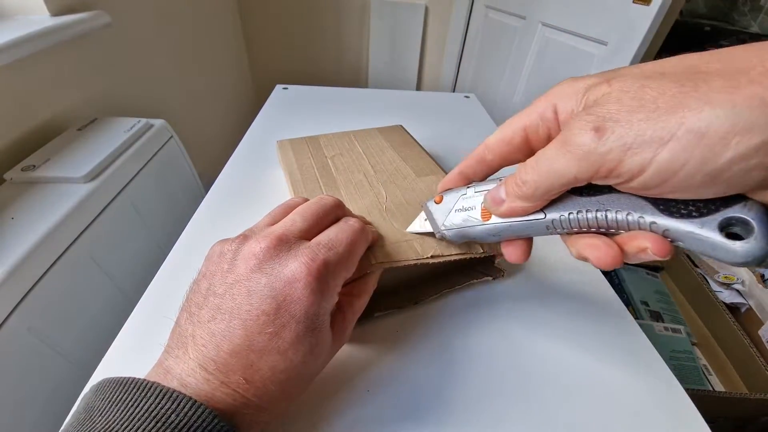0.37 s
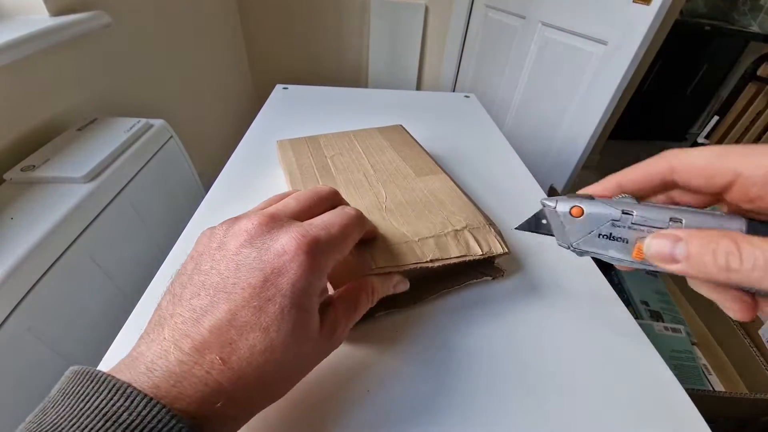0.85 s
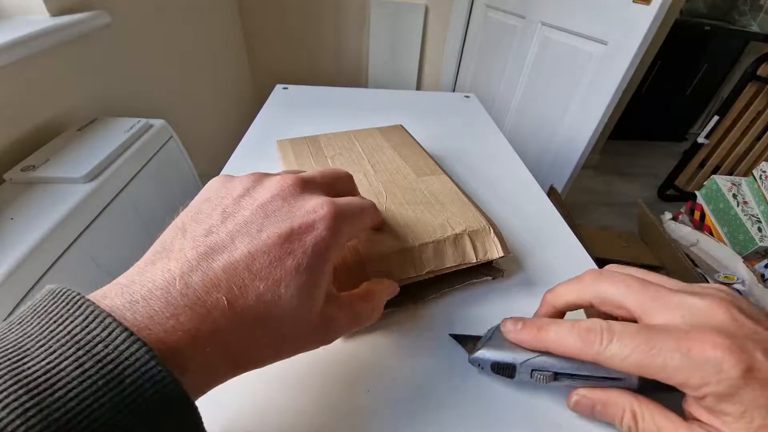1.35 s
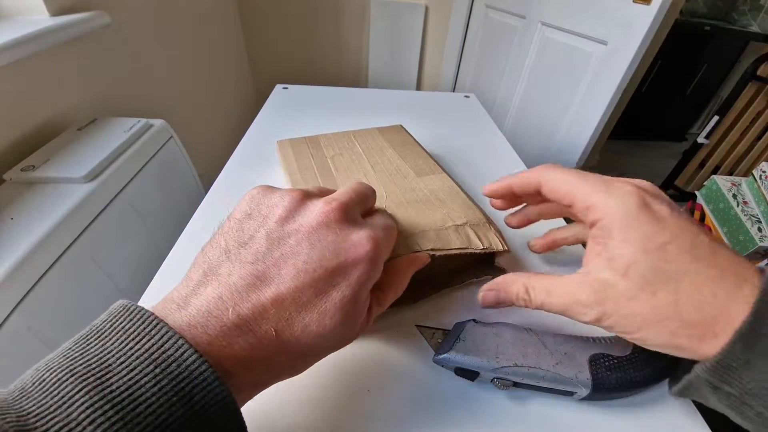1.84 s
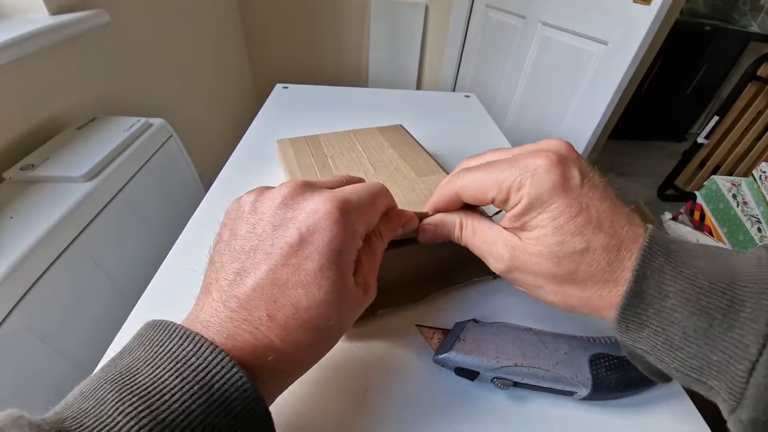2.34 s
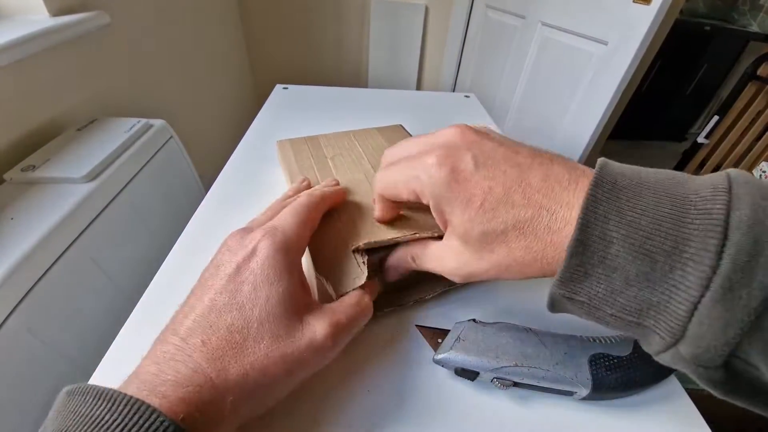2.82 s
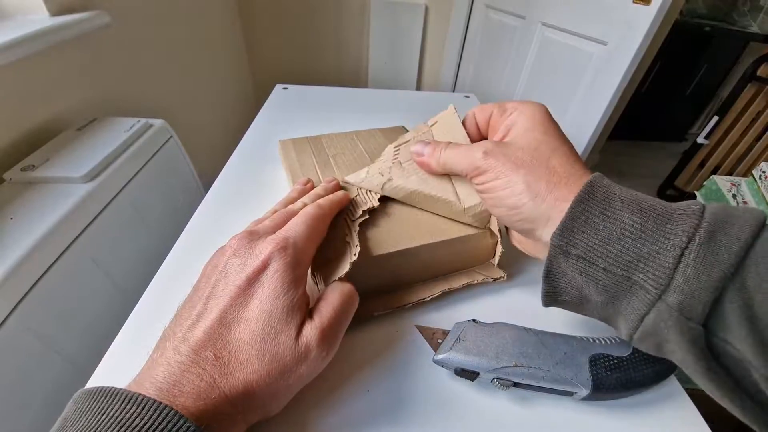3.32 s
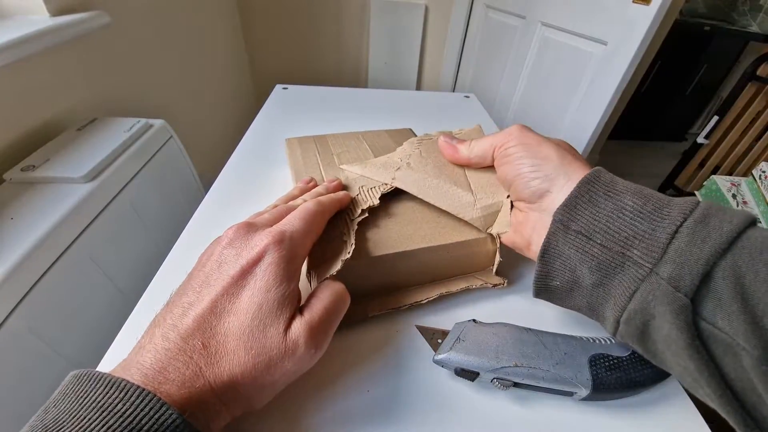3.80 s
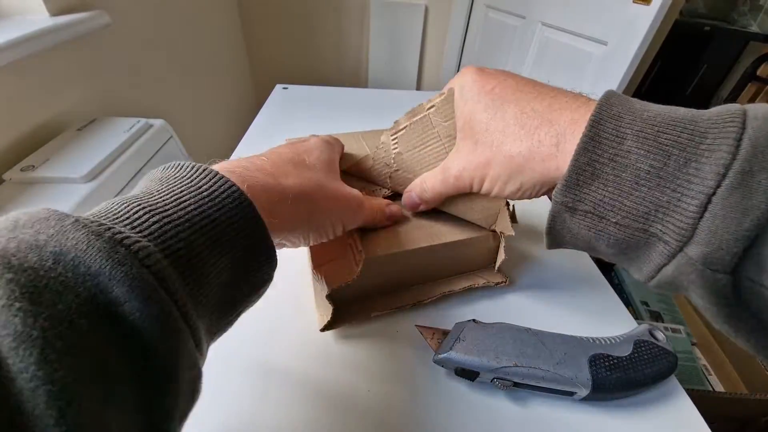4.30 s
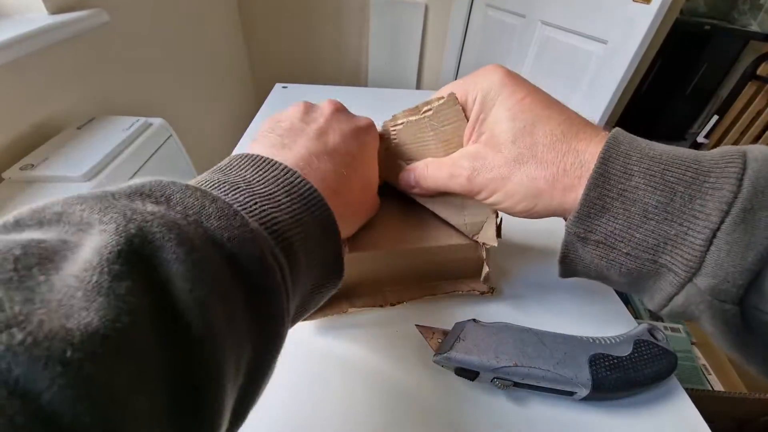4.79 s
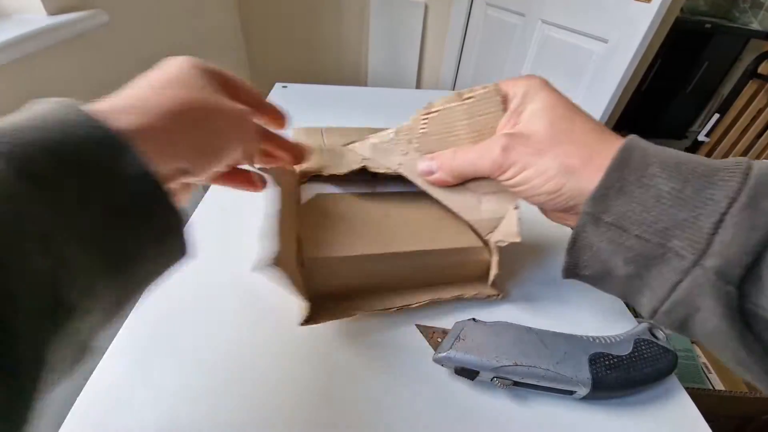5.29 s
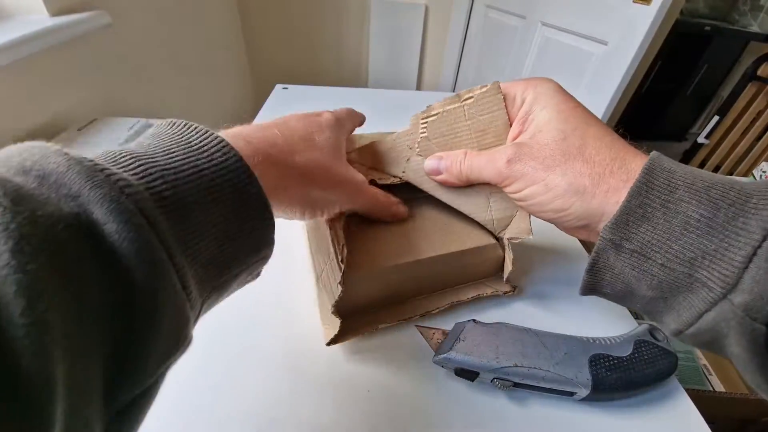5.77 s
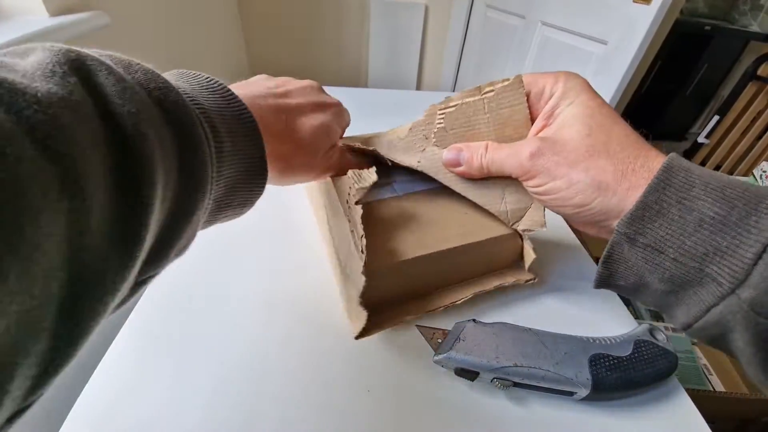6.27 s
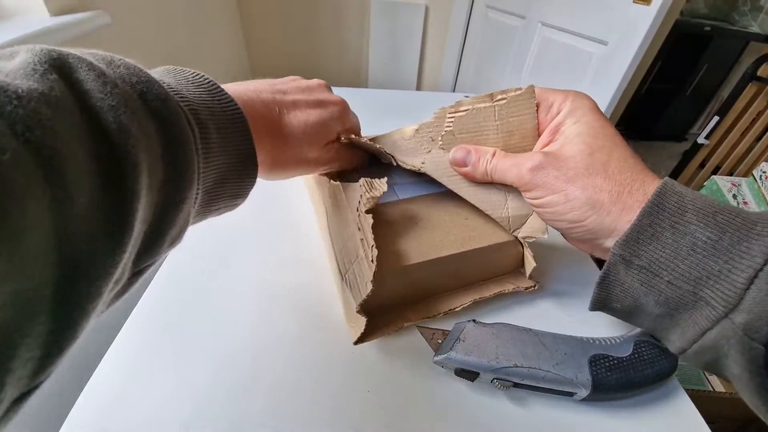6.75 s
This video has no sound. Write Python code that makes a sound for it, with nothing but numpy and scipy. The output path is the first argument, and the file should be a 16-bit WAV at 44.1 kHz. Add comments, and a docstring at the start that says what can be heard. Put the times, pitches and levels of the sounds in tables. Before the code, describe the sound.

Close, dry stereo in a small quiet room. A knife rasps through corrugated cardboard for under a second, light rustles follow, and its handle lands on a hollow table with a double knock. Then fingers pull the board apart: sharp glue snaps, crackling fibre tears and creaks, growing heavier, with low thumps and rumble as the parcel shifts.

```python
"""Cardboard fibres tear in a dense bright crackle: clumpy hiss with random pops that ring briefly.
First a knife is drawn through the parcel, then it is laid down and hands rip the board open.
The board creaks as shaken resonances, glue snaps as short pulses with fizz, an edge ratchets, a fingertip squeaks.
The hollow table knocks through its ringing modes and rumbles under the parcel.
A small room of feedback delays answers, over a faint hush, at a close pair of microphones."""
import sys
import numpy as np
from scipy import signal
from scipy.fft import rfft, irfft, next_fast_len
from scipy.io import wavfile
from scipy.ndimage import map_coordinates

SR = 44100
rng = np.random.default_rng(int(sys.argv[2]) if len(sys.argv) > 2 else 0)


def log_audio(samples):
    """Write samples as a 16-bit WAV file to the path given in sys.argv[1]."""
    # one column per channel
    frames = np.atleast_2d(samples).T
    # limit to full scale, then quantise
    limited = np.clip(frames, -1, 1)
    pcm = np.round(limited * 32767).astype(np.int16)
    wavfile.write(sys.argv[1], SR, pcm)


def gain_from_db(level_db):
    """Turn a decibel level (scalar or array-like) into a linear amplitude factor."""
    decades = np.asarray(level_db, float) / 20
    return 10 ** decades


N = 303554

CUT_ENDS_S = 0.684   # the knife works until here, then the hands


def rms_one(x):
    """Scale to rms 1."""
    return x / np.sqrt(np.mean(x ** 2) + 1e-20)


def between(start, end):
    """True inside a stretch of time in seconds."""
    return (np.arange(N) >= start * SR) & (np.arange(N) < end * SR)


def in_time(rows):
    """Draw straight lines between the rows of a table: one curve per column, sample by sample."""
    s, *columns = np.transpose(rows)
    return [np.interp(np.arange(N) / SR, s, column) for column in columns]


def swells(s, db, rise_s, fall_s):
    """Each swell climbs to its peak and falls away evenly in dB; their powers add. Returns dB."""
    t = np.arange(0, N + 32, 32) / SR
    since = t - np.c_[s]
    rise = np.c_[np.maximum(rise_s, 0.002)]   # seconds per 20 dB, never under 2 ms
    fall = np.c_[np.maximum(fall_s, 0.002)]
    down = np.where(since < 0, -since / rise, since / fall)
    power = np.sum(gain_from_db(np.c_[db] - 20 * np.minimum(down, 8)) ** 2, axis=0)
    return np.interp(np.arange(N) / SR, t, 10 * np.log10(power))


def colour(x, spectrum):
    """Give a flat signal a spectrum in dB per Hz; rms 1."""
    size = next_fast_len(N)
    hz, db = np.transpose(spectrum)
    bins_hz = np.fft.rfftfreq(size, 1 / SR)
    gain = gain_from_db(np.interp(np.log(bins_hz + 1), np.log(hz), db))
    return rms_one(irfft(rfft(x, size) * gain, size)[..., :N])


def split(x, hz=8200.0):
    """Below and above a frequency, each rms 1."""
    filters = [signal.butter(3, hz, kind, fs=SR, output="sos") for kind in ("low", "high")]
    return [rms_one(signal.sosfilt(sos, x)) for sos in filters]


def band_pass(x, order, low_hz, high_hz):
    """Keep the sound between two frequencies."""
    return signal.sosfilt(signal.butter(order, [low_hz, high_hz], "band", fs=SR, output="sos"), x)


def decay(x, t60_s):
    """Let every click die away evenly, by 60 dB in t60_s."""
    return signal.lfilter([1], [1, -gain_from_db(-60 / (t60_s * SR))], x)


def soften(x, hz):
    """A soft contact blurs a blow: twice a one-pole low-pass."""
    r = np.exp(-2 * np.pi * hz / SR)
    return signal.lfilter([(1 - r) ** 2], [1, -2 * r, r * r], x)


def flutter(rate):
    """Slow chance: noise twice through a one-pole low-pass; spread 1."""
    r = np.exp(-2 * np.pi * rate / SR)
    noise = rng.standard_normal(N + SR)
    return rms_one(signal.lfilter([1], [1, -2 * r, r * r], noise)[SR:])


def grains(per_s, spread_db):
    """Random clicks with a long tail of sizes and either sign."""
    sizes = gain_from_db(spread_db * np.minimum(rng.exponential(1, N), 5)) * rng.choice([-1, 1], N)
    return sizes * (rng.random(N) < per_s / SR)


def clicks(seconds, db):
    """One impulse per event, over a floor far too faint to hear."""
    out = np.full(N, 1e-18)
    places = np.minimum(np.round(np.asarray(seconds) * SR).astype(int), N - 1)
    np.add.at(out, places, gain_from_db(db))
    return out


# colour of the background hush: [f/Hz, level/dB per Hz], only its shape counts
HUSH_COLOUR = [(18, -33), (30, 1.5), (273, -6), (540, -3.5), (822, 7.5), (3140, -3), (4190, -15),
               (4530, -27.5), (6380, -17.5), (16000, -37)]


def hush():
    """A faint steady background: coloured noise, separate on each side."""
    return gain_from_db(-69) * colour(rng.standard_normal((2, N)), HUSH_COLOUR)


ROOM_T60_S, WALL_CUT_HZ = 0.22, 11400


def room(x):
    """Eight feedback delays a side, duller on every round, stepped block by block."""
    out = np.zeros((2, N))
    dull = np.exp(-2 * np.pi * WALL_CUT_HZ / SR)
    lags = (rng.uniform(0.009, 0.035, 16) * SR).astype(int)
    for k, lag in enumerate(lags):
        loop, state = x.copy(), [0.]
        gain = gain_from_db(-60 * lag / SR / ROOM_T60_S)
        for i in range(lag, N, lag):
            back, state = signal.lfilter([gain * (1 - dull)], [1, -dull], loop[i - lag:i], zi=state)
            loop[i:i + lag] += back[:N - i]
        out[k % 2] += (loop - x) * (-1) ** (k // 2)
    return out


def mirrored(pair):
    """The table top mirrors the parcel; the detour shifts as hands and flaps move, so notches wander."""
    detour = SR * np.clip(0.0007 + 0.00015 * flutter(1.0), 0.0001, 0.003)   # samples
    path = [np.arange(N) - detour]
    echo = [map_coordinates(side, path, order=3, mode="nearest") for side in pair]
    return pair + 0.3 * np.array(echo)


# ringing modes of the table top: [f/Hz, level/dB, time to die by 60 dB t/s]
TABLE_MODES = [(194.4, -29, 0.17), (247, -39, 0.47), (298.4, -26.5, 0.29), (312, -7, 0.12),
               (345, -8.5, 0.14), (390, -19.5, 0.12), (437, -23.5, .1), (513, -19, 0.055), (545, -33, 0.18),
               (565, -20.5, 0.2), (678, -22.5, 0.12), (713, -19, 0.16), (810, -27.5, .1), (1022, -26, 0.22),
               (1123, -26, .1), (1280, -24, 0.051), (1377, -19.5, 0.088), (1535, -26, 0.089),
               (1590, -33, 0.12), (2015, -53, .1), (3100, -47, .06), (4011, -41, .06)]


def table(force):
    """A blow sets each mode of the table top ringing; the top radiates little below its modes."""
    out = 0
    for hz, db, t60 in TABLE_MODES:
        r, w = gain_from_db(-60 / (t60 * SR)), 2 * np.pi * hz / SR
        out = out - signal.lfilter([0, gain_from_db(db) * np.sin(w)], [1, -2 * r * np.cos(w), r * r], force)
    return signal.sosfilt(signal.butter(4, 200, "high", fs=SR, output="sos"), out)


# knocks passed into the table top: [t/s, level/dB compared with one another]
KNOCK_TIMES = [(0.238, -47), (0.345, -27), (0.479, -30), (0.691, -21.5), (0.754, -35), (0.839, -36),
               (1.134, -40), (1.28, -47), (1.37, -51), (1.447, -25), (1.595, -19.5), (2.145, -34.5),
               (2.491, -31.5), (2.622, -34.5), (2.983, -34.5), (3.089, -23.5), (3.287, -27.5), (4.027, -42),
               (4.339, -43), (4.461, -41), (4.587, -26), (4.69, -32), (4.931, -50.5), (4.996, -11.5),
               (5.2, -29), (5.28, -27.5), (5.332, -36), (5.382, -30), (5.492, -19), (5.579, -20.5),
               (5.651, -29), (5.845, -24.5), (6.01, -30), (6.137, -23), (6.283, -19), (6.385, -15.5),
               (6.41, -27), (6.45, -19.5), (6.572, -34), (6.615, -27), (6.744, -34.5), (6.803, -16.5)]


def knocks():
    """Soft bumps of the parcel set the table top ringing."""
    s, db = np.transpose(KNOCK_TIMES)
    return table(soften(clicks(s, db - 3.0), 433))


# the handle's landings: [t/s, blow level/dB, hardness as low-pass f/Hz, tick level/dB, free ring t/s];
# the levels compare the landings with one another
HANDLE_LANDINGS = [(1.464, 1, 1110, -25, 0.016), (1.617, -21, 1800, -32, 0.0083),
                   (1.691, -2.5, 970, -28, 0.028), (1.701, -7, 2240, -37, .011)]
# the hollow frame under the top: [f/Hz, level/dB per Hz], only its shape counts
FRAME_COLOUR = [(140, -32), (220, -6), (320, 3), (480, -11.5), (750, -12.5), (1400, -24), (2000, -28),
                (3000, -76)]


def knife_laid_down():
    """Hard landings of the knife handle ring the table, shudder its frame and tick."""
    out, t = 0, np.arange(N) / SR
    for s, db, hardness_hz, tick_db, free_s in HANDLE_LANDINGS:
        # the handle comes to rest and damps the top
        settled = np.clip((t - s - free_s) / 0.00201, 0, 1)
        out = out + gain_from_db(-11 * settled) * table(soften(clicks([s], db), hardness_hz))
    s, db, hardness_hz, tick_db, free_s = np.transpose(HANDLE_LANDINGS)
    dying = decay(soften(clicks(s, db - 24.5), 51), 0.28)
    dying += decay(clicks(s, db - 40.5), 0.6)   # a fainter, longer tail
    # the frame has too many modes to tell apart, so noise stands for them
    shudder = dying * colour(rng.standard_normal(N), FRAME_COLOUR)
    tick = decay(clicks(s, tick_db + 5), 0.02) * rng.standard_normal(N)   # plastic on laminate
    return out + shudder + band_pass(tick, 2, 1000, 7000)


# colour of the parcel dragging: [f/Hz, level/dB per Hz], only its shape counts
RUMBLE_COLOUR = [(15, -34), (25, -18.5), (91, -2.5), (242, -3.5), (335, 3), (394, -10.5), (447, -1),
                 (500, -13.5), (650, -42), (1100, -120)]


def rumble(db):
    """The parcel drags and rocks on the table in lumps of noise, which also excite the table top."""
    lumps = rng.standard_normal(N) * gain_from_db(4.1 * flutter(14))
    return gain_from_db(db) * rms_one(colour(lumps, RUMBLE_COLOUR) + 0.41 * rms_one(table(lumps)))


# cardboard panel in the hands: [f/Hz, width f/Hz, level/dB]
BOARD_PEAKS = [(268, 50, -18), (580, 162, -2), (750, 209, -0.5), (928, 124, -0.5), (1352, 384, -2.5),
               (1442, 303, 0), (2053, 370, -8.5), (3120, 280, -15.5)]


def board(force, peaks=BOARD_PEAKS):
    """Broad panel resonances in parallel, signs alternating."""
    out = 0
    for k, (hz, width_hz, db) in enumerate(peaks):
        r = np.exp(-np.pi * width_hz / SR)
        poles = [1, -2 * r * np.cos(2 * np.pi * hz / SR), r * r]
        ring = signal.lfilter([1, 0, -1], poles, force) * (1 - r * r) / 2
        out = out + (-1) ** k * gain_from_db(db) * ring
    return out


# a fingertip squeaks on the liner: [peak t/s, level/dB, rise t/s per 20 dB, fall t/s per 20 dB]
SQUEAK_SWELLS = [(2.5, -54, .04, .25), (2.594, -52, .1, .08)]


def squeak():
    """A fingertip rubs the liner: noise twice through one narrow resonance."""
    peak = [(1890, 260, 0)]   # f/Hz, width f/Hz, level/dB
    tone = board(board(rng.standard_normal(N), peak), peak)
    return gain_from_db(swells(*np.transpose(SQUEAK_SWELLS))) * rms_one(tone)


RATCHET_START_S, RATCHET_STEP_S, RATCHET_FLUTES = 6.1385, 0.0135, 7


def ratchet():
    """An edge ratchets over the flutes: one dull pop each, with a short ring of the panel."""
    chance = rng.standard_normal((RATCHET_FLUTES, 2))
    s = RATCHET_START_S + RATCHET_STEP_S * (np.arange(RATCHET_FLUTES) + 0.08 * chance[:, 0])
    uneven_db = 2 * chance[:, 1]
    pop = band_pass(clicks(s, uneven_db + 1), 3, 450, 1700)
    return pop + board(soften(clicks(s, uneven_db + 10), 960))


# glue and fibre bundles snapping: [t/s, crack level/dB, board ring level/dB before a common boost]
SNAP_TIMES = [(0.5891, -31, -37), (0.6847, -41, -24), (0.6925, -32, -22.5), (0.7004, -26, -30),
              (1.0104, -24.5, -62), (1.1098, -47, -65), (1.1857, -41, -49), (1.277, -52, -63),
              (2.0255, -46, -46.5), (2.0363, -42, -57), (2.0497, -52, -60), (2.144, -49, -54),
              (2.2486, -62, -42.5), (2.2885, -30, -41), (2.3307, -7, -29), (2.3434, -13, -35),
              (2.3505, -15, -27), (2.3654, -10, -38), (2.4858, -27, -34.5), (2.5331, -30, -57),
              (2.5691, -24, -53), (2.5828, -16.5, -42), (2.745, -31, -46.5), (2.7945, -48, -44),
              (2.9238, -48, -38), (2.9844, -38, -39.5), (3.0485, -27, -36), (3.0784, -39, -32),
              (3.0915, -13.5, -28), (3.1124, -25, -31), (3.2101, -28, -61), (3.247, -23, -44),
              (3.2808, -24, -37), (3.2954, -16, -43), (3.4009, -18, -47), (3.5578, -35, -44),
              (3.6, -27, -45.5), (3.6526, -31, -45), (3.7234, -45, -36), (3.7374, -28, -43.5),
              (3.8022, -31, -54), (3.8417, -42, -49), (3.8736, -39, -59), (3.908, -24.5, -49.5),
              (4.0241, -28.5, -29), (4.3635, -28.5, -40.5), (4.4, -24.5, -49.5), (4.5544, -35.5, -42),
              (4.6004, -41, -38.5), (4.7634, -26, -34), (4.824, -27, -30.5), (4.9534, -49, -42),
              (4.98, -29, -46.5), (4.997, -5, -17), (5.0048, -37, -26), (5.018, -14.5, -16),
              (5.1306, -42, -36.5), (5.2016, -41, -40.5), (5.23, -49, -38), (5.245, -38, -33),
              (5.2654, -31, -52), (5.2814, -24, -33), (5.3366, -37, -30), (5.369, -25, -34),
              (5.3799, -6, -15), (5.3887, -6, -43), (5.4004, -24, -32), (5.4144, -21, -24.5),
              (5.5128, -25, -33.5), (5.6113, -33, -33.5), (5.6795, -42, -33.5), (5.8414, -20, -32.5),
              (6.0411, -22, -50), (6.2838, -15, -20), (6.2964, -26, -31), (6.315, -17, -25.5),
              (6.3858, -35, -29.5), (6.4542, -31, -33), (6.5745, -49, -44), (6.6208, -26, -48),
              (6.6368, -24, -56), (6.7972, -30, -35), (6.8081, -12.5, -57.5), (6.8422, -29, -40)]


def snaps(fibre_db, crisp_db, board_db):
    """Each snap is a sharp pulse, a crack with a dying fizz, and a jolt into the panel."""
    s, peak_db, ring_db = np.transpose(SNAP_TIMES)
    # small unplanned snaps, 25 per second, follow the level of fibres and creak
    small = np.abs(grains(25, spread_db=3.0)) * ~between(0, CUT_ENDS_S)
    cracks = clicks(s, peak_db) + small * gain_from_db(fibre_db + 13.5)
    jolts = clicks(s, ring_db) + small * gain_from_db(board_db)
    low, high = split(colour(rng.standard_normal(N), FIBRE_COLOUR))
    out = band_pass(cracks, 2, 1200, 8000) + gain_from_db(38.5) * board(jolts)
    low_kick = gain_from_db(-7.5) * cracks
    high_kick = gain_from_db(-9.5 + crisp_db) * cracks
    for band, kick in ((low, low_kick), (high, high_kick)):
        crack = decay(kick, 0.0071)
        fizz = 0.2 * decay(kick, 0.0034)
        out = out + band * (crack + fizz)
    return out


FLUTES_PER_S = 95   # flutes crossed by the blade, typically; the speed wavers
# resonances of the board under the blade: [f/Hz, width f/Hz, level/dB]
BLADE_PEAKS = [(230, 120, -4), (495, 290, -6.5), (753, 200, 3.5), (1150, 240, 0.5), (1380, 450, -1.5),
               (2800, 590, -8.5), (7000, 250, -15), (11000, 420, -10)]


def creak(db):
    """Stick and slip of the blade, later of the fingers, shakes the panel."""
    slips = grains(700 * gain_from_db(3.0 * flutter(17)), spread_db=2.5) + 0.26 * rng.standard_normal(N)
    slips = slips * gain_from_db(2.0 * flutter(36))
    crossed = np.cumsum(FLUTES_PER_S * gain_from_db(1.0 * flutter(8)) / SR) % 1
    bite = 0.6 + 1.5 * np.exp(-crossed / 0.25)   # hardest as the blade meets each flute
    rasp = board((0.5 * slips + rng.standard_normal(N)) * bite, BLADE_PEAKS)
    by_hand = board(slips)
    return gain_from_db(db) * np.where(between(0, CUT_ENDS_S), rms_one(rasp), rms_one(by_hand))


def pops():
    """Single fibres snap at random, each ringing a few cycles at one of sixteen pitches."""
    force = grains(900 * gain_from_db(4.0 * flutter(20)), spread_db=3.5)
    pitches, dealt = np.geomspace(1000, 13000, 16), rng.integers(0, 16, N)
    rings = [board(force * (dealt == k) + 1e-18, [(hz, 0.54 * hz, 0)]) for k, hz in enumerate(pitches)]
    return rms_one(sum(rings))


# colour of parting fibres: [f/Hz, level/dB per Hz], only its shape counts
FIBRE_COLOUR = [(700, -17), (1500, 3.5), (2000, -0.5), (2800, 2.5), (3500, 4), (5700, 0.5), (8500, -4.5),
                (12000, -8.5), (17000, -6.5)]


def fibres(db, top_db):
    """Fibres part in clumps of fine hiss, at three places along the rip; pops stand out at the nearest."""
    clump = gain_from_db(1.47 * flutter(35) + 2.0 * flutter(250))
    hiss = rng.standard_normal((3, N)) + 0.5 * grains(900, spread_db=3.5)
    rip = colour(clump * hiss, FIBRE_COLOUR)
    rip[0] += 0.8 * pops()
    low, high = split(rip)
    return gain_from_db(db) * low + gain_from_db(top_db) * high


BLADE_HISS_DB, BLADE_HISS_FOLLOWS = -53.5, 0.71   # fibre level at a rasp of -40 dB; share of its swing
RUMBLE_FOLLOWS = 0.76   # share of the creak's swing heard in the rumble
ROCKING_HZ = 36         # the parcel's weight smooths its rumble
# the blade drawn through the board: [t/s, pressure as rasp level/dB]
CUT_PRESSURE = [(0.0, -34.5), (0.114, -37), (0.21, -39), (0.24, -31), (0.28, -30), (0.305, -42.5),
                (0.352, -38), (0.4, -43), (0.43, -54.5), (0.5, -46.5), (0.58, -44.5), (0.61, -35),
                (0.68, -44.5)]
# tugs, slides and folds; rises and falls under 0.002 s, even negative ones, count as 0.002 s:
# [peak t/s, fibre level/dB, creak level/dB, rise t/s per 20 dB, fall t/s per 20 dB]
TUG_SWELLS = [(.686, -35.5, -28.5, 0.5, 0.03), (.72, -55.5, -51.5, 2, 0.12), (.97, -76, -70, .1, -3),
              (1.014, -56, -68, 0.06, 0.01), (1.018, -62.5, -58, 0.02, 0.08), (1.048, -67, -51, 0.07, -0.1),
              (1.108, -81, -80, 1.3, 0.5), (1.188, -61, -53, -0.1, 0.06), (1.23, -61.5, -59, 0.02, 0.04),
              (1.284, -61.5, -52, .016, 0.06), (1.325, -62.5, -56, .04, -0.22),
              (1.431, -71, -43, -0.06, -0.1), (1.474, -57, -74, 0.08, 0.14), (1.61, -58, -70.5, 0.21, 0.22),
              (1.73, -59.5, -69, 0.38, 0.02), (1.948, -66, -72.5, -0.05, 0), (2.055, -65, -53.5, .05, 0.2),
              (2.14, -68, -54.5, -0.45, 0.2), (2.255, -63, -54.5, 0.14, 0.1), (2.29, -62, -70, 0.05, 0.4),
              (2.333, -38, -29, -0.0018, 0.08), (2.364, -46, -39, 0.03, 0.11),
              (2.521, -57.5, -50, -0.15, 0.4), (2.59, -51, -48, 0.05, 0.06), (2.742, -57, -67, 0.06, 0.18),
              (2.839, -66.5, -53.5, 0.16, .08), (2.933, -61, -55, -1, 1.3), (3.02, -60, -51.5, -0.28, 0.2),
              (3.052, -45, -42, -0.12, 0.14), (3.096, -38, -38.5, 0.0024, 0.08),
              (3.21, -53, -55, -0.03, 0.54), (3.285, -43.5, -43.5, 0.06, 0.1753),
              (3.406, -47, -42, -0.07, 0.05), (3.55, -54.5, -53, -0.1, 0.36),
              (3.588, -52.5, -50, -0.01, 0.11), (3.734, -53, -49, 0.09, 0.08), (3.841, -56.5, -51, 0, .16),
              (4.028, -57, -47.5, -0.14, 0.18), (4.064, -58, -60, -0.15, 0.35),
              (4.198, -52, -51, 0.15, 0.08), (4.373, -57.5, -49.5, 0.2, 0.2),
              (4.566, -50.5, -45, 0.11, 0.07), (4.687, -50.5, -43.5, .065, 0.45),
              (4.874, -58.5, -43, 0.54, -0.66), (4.955, -75.5, -56.5, -0.3, 0.4),
              (4.999, -36.5, -19, -0.03, 0.0245), (5.05, -52.5, -39, 0.15, .17),
              (5.275, -53, -47.5, 0.12, 0.06), (5.339, -50, -40, 0.04, 0.03),
              (5.369, -42, -32, -0.0039, 0.02), (5.391, -28, -22, 0.0213, 0.0326),
              (5.431, -39.5, -35.5, 0.05, 0.1935), (5.515, -57, -39, 0.02, 0.03),
              (5.685, -52.5, -39.5, 0.17, 0.03), (5.815, -63.5, -58, -0.5, 4), (5.838, -58, -44, 0.03, 0.4),
              (5.987, -44.5, -37, 0.05, 0.01), (6.051, -54.5, -49, 0.17, 0.1),
              (6.139, -53.5, -40, 0.05, 0.16), (6.215, -61, -39, 0.12, .05),
              (6.256, -55, -43.5, 0.21, -0.28), (6.286, -33.5, -27.5, .003, 0.1),
              (6.32, -35, -31, .05, -0.0048), (6.492, -47.5, -38.5, 0.14, 0.03),
              (6.59, -70, -50.5, 0.74, -1.3), (6.622, -57, -34.5, 0.04, -0.1),
              (6.67, -44.5, -39.5, 0.09, 0.06), (6.74, -61, -58, -0.1, 0.5),
              (6.808, -43, -36.5, -0.03, 0.1), (6.845, -49.5, -44, -0.02, -0.2),
              (6.88, -52, -45.5, 0.18, -1)]
# how the hands work: [t/s, crispness as treble lift level/dB, weight on the table as rumble level/dB]
HAND_WORK = [(0, -2.5, -3.5), (.65, -2.5, -9.5), (.85, -11.5, 1), (1.15, 10, -17), (1.5, -16.5, -22),
             (1.85, 3, -3), (2.1, 4, -6.5), (2.4, 0, -7.5), (2.75, 4, -2.5), (3.3, 5.5, -3), (3.9, 2, -7.5),
             (4.3, -2.5, -2.5), (4.9, 0.5, 0), (5.2, 1.5, 0), (5.6, -5, 0.5), (5.9, -0.5, 1.5),
             (6.3, -2, -1), (6.88, 6, -2.5)]
# the parcel is shoved or rocks, with the same 0.002 s limit:
# [peak t/s, rumble level/dB, rise and fall t/s per 20 dB]
SHOVE_SWELLS = [(.114, -42, -0.03), (.75, -47, -0.23), (0.861, -53, -0.2), (1.178, -55, -0.06),
                (1.39, -69, 5), (2.22, -54, 0.13), (2.42, -54, .05), (2.68, -57, -0.3), (2.83, -45.5, .05),
                (2.94, -48.5, .05), (3.4, -47, -0.4), (3.57, -55, .05), (3.74, -58, 0.4),
                (4.171, -36.5, -0.25), (4.302, -40, -0.11), (4.56, -45, 0.12), (5.29, -45, -0.16),
                (4.76, -46, 0.24), (5.002, -37.5, 0.12), (5.39, -30.5, 0.1158), (5.52, -33.5, 0.01),
                (5.61, -38.5, .06), (5.78, -60.5, -2.9), (5.849, -21.5, -0.03), (6.15, -36, 0.08),
                (6.22, -39, .06), (6.312, -30, 0.11)]


def effort():
    """Levels of fibres, crispness, creak and rumble, from the cut, the tugs, the hands and the shoves."""
    s, fibre_db, board_db, rise_s, fall_s = np.transpose(TUG_SWELLS)
    rasp_db, = in_time(CUT_PRESSURE)
    crisp_db, weight_db = in_time(HAND_WORK)
    cutting = between(0, CUT_ENDS_S)
    blade_hiss_db = BLADE_HISS_DB + BLADE_HISS_FOLLOWS * (rasp_db + 40)
    fibre_db = np.where(cutting, blade_hiss_db, swells(s, fibre_db, rise_s, fall_s))
    board_db = np.where(cutting, rasp_db, swells(s, board_db, rise_s, fall_s))
    rocking_db = 20 * np.log10(soften(gain_from_db(board_db), ROCKING_HZ) + 1e-9)
    dragged = gain_from_db(RUMBLE_FOLLOWS * (rocking_db + 50) - 50 + weight_db)
    s, shove_db, length_s = np.transpose(SHOVE_SWELLS)
    shoved = gain_from_db(swells(s, shove_db, length_s, length_s))
    table_db = 20 * np.log10(np.hypot(dragged, shoved))
    return fibre_db, crisp_db, board_db, table_db


TREBLE_GROWS = 0.17   # extra treble dB per dB of tear
REST_START_S, REST_END_S = 1.43, 1.97   # the parcel rests: no creak, no rumble
# where the parcel sits: [t/s, left minus right level/dB, samples by which left leads]
PARCEL_PLACE = [(0.0, 0.5, 6.1), (1.34, 3, 7.1), (2.4, 1.5, 6.7), (3.2, 3.5, 7.6), (3.8, 3.5, 6.9),
                (4.7, 3.5, 6.35), (5.3, 4, 7.8), (6.88, 2.5, 6.3)]


def scene():
    """All sources meet the two microphones with a level and time difference."""
    fibre_db, crisp_db, board_db, table_db = effort()
    moving = ~between(REST_START_S, REST_END_S)
    pan_db, lead = in_time(PARCEL_PLACE)
    top_db = fibre_db + crisp_db + TREBLE_GROWS * (fibre_db + 53)
    near, *far = fibres(fibre_db, top_db)
    parcel = near + moving * creak(board_db) + snaps(fibre_db, crisp_db, board_db) + ratchet() + squeak()
    drag = moving * rumble(table_db)
    late = map_coordinates(parcel, [np.arange(N) - lead], order=3, mode="nearest")
    # the ends of the rip differ at each microphone
    pair = np.array([parcel, late]) + 2.476 * np.array(far)
    blows = knocks() + knife_laid_down()
    # the wide table top reaches both microphones almost alike
    right_boom = np.roll(blows, shift=4) + np.roll(drag, shift=6)
    boom = np.array([blows + drag, right_boom]) * gain_from_db(np.array([[0.5], [-0.5]]))
    background = hush()
    direct = mirrored(pair) * gain_from_db(-1.5) * gain_from_db([pan_db / 2, -pan_db / 2])
    answer = gain_from_db(-15.5) * room(parcel) + gain_from_db(-23.5) * room(drag + blows)
    return direct + boom + answer + background


def band_limit(x):
    """A steep low-pass at the top of the band."""
    return signal.sosfilt(signal.butter(12, 16800, fs=SR, output="sos"), x)


def record(dry):
    """Peaks are gently rounded, then the treble above 16 kHz is cut."""
    rounded = 1.511 * np.tanh(dry / 1.117)
    low_pass = signal.cheby2(12, 40, 16000, fs=SR, output="sos")
    mix = signal.sosfilt(low_pass, rounded)
    return band_limit(mix)


dry = scene()
out = record(dry)
log_audio(out)
```